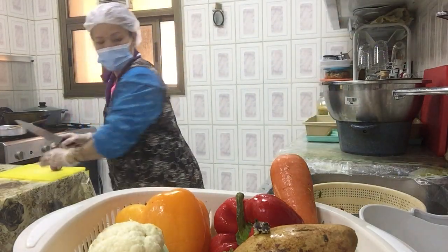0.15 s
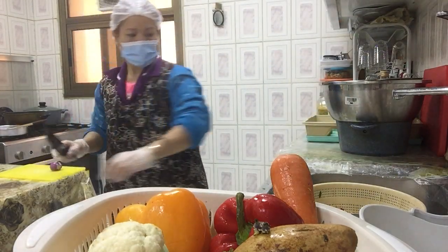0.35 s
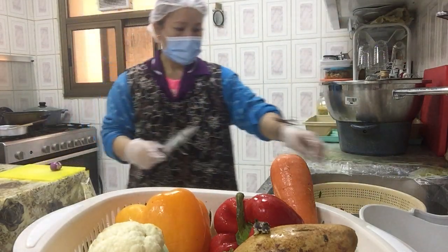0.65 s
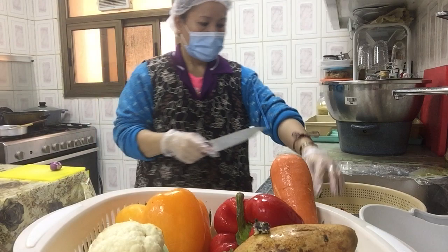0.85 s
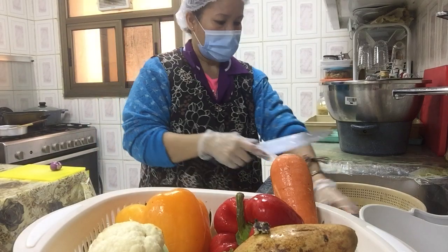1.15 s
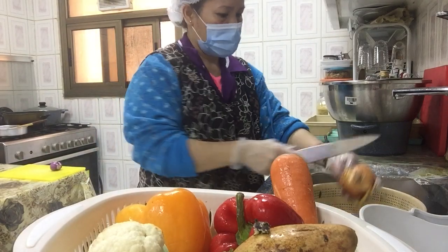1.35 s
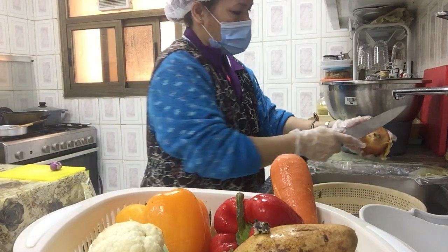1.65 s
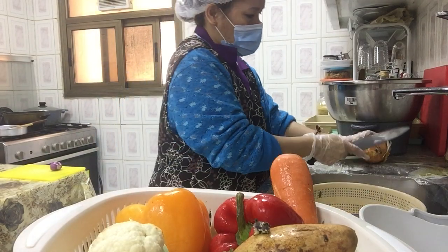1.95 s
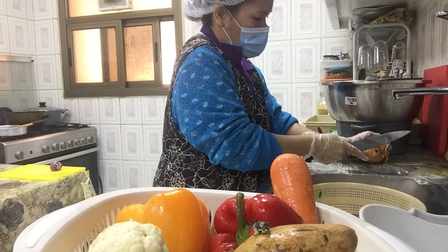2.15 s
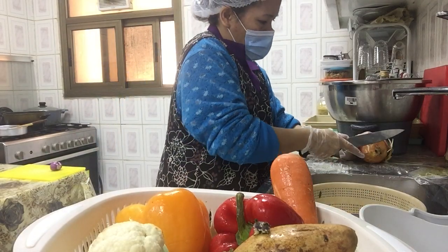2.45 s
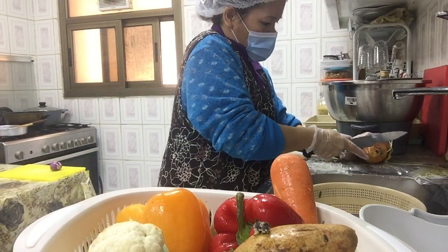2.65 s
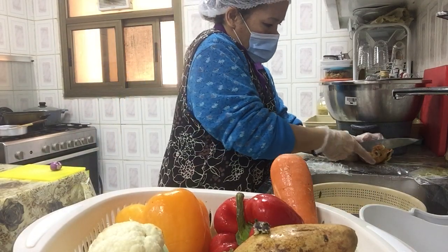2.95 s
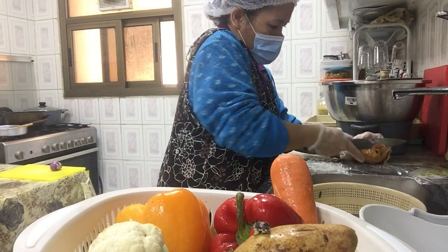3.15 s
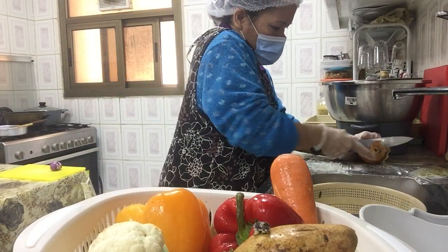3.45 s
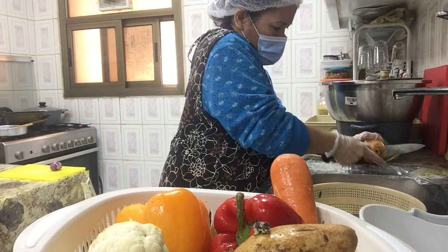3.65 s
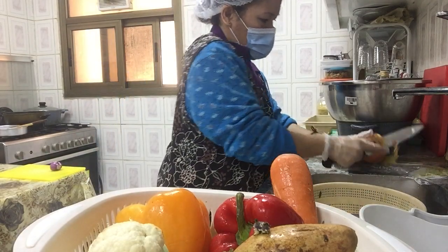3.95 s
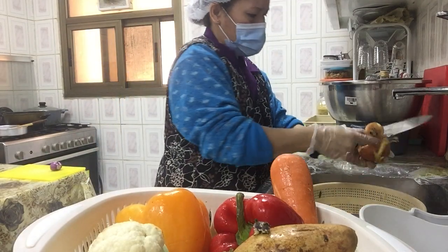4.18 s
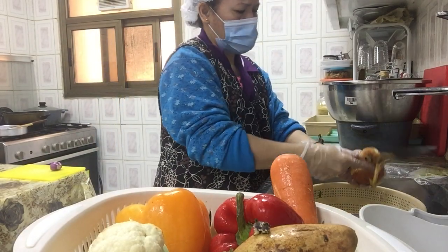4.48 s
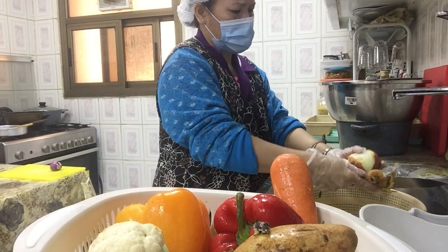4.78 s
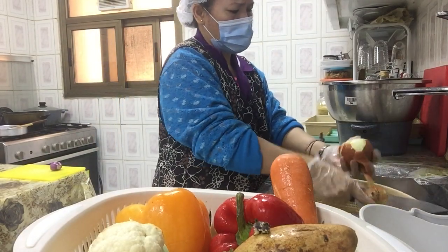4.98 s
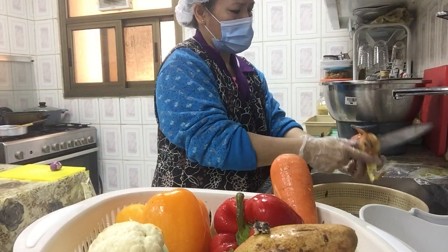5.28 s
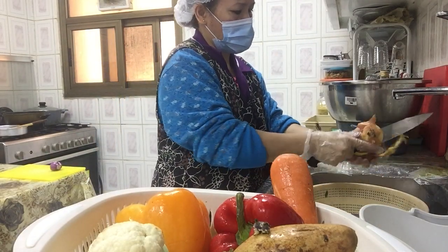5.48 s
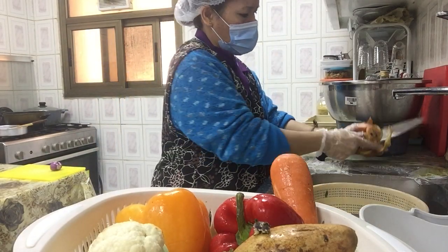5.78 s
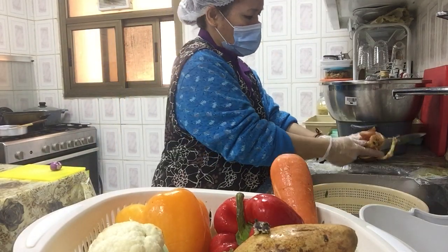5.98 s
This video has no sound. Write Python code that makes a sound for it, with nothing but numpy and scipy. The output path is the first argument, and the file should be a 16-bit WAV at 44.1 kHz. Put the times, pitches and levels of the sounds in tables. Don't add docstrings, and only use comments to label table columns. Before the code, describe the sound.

Over a steady low hum, crisp onion peel snaps and crackles in gloved hands, then hollow thuds knock the steel basin near the end.

```python
import sys
import numpy as np
from scipy import signal
from scipy.fft import rfft, irfft, next_fast_len
from scipy.io import wavfile

SR = 44100
rng = np.random.default_rng(int(sys.argv[2]) if len(sys.argv) > 2 else 0)


def transcribe(u):
    v = np.clip(np.atleast_2d(u).T, -1, 1)
    q = np.round(v * 32767).astype(np.int16)
    wavfile.write(sys.argv[1], SR, q)


def field_ratio(decibels):
    return 10 ** (np.asarray(decibels, dtype=float) / 20)


N = 269892

# [f/Hz, level/dB rms, waver/dB]
COMPRESSOR_LINES = [(100.07, -45.3, .5), (171.1, -48.2, .2), (230.5, -67, 3)]
# [f/Hz, level/dB per Hz]
VENT_SPECTRUM = [(25, 2.5), (45, 2), (85, -1), (118, -1), (150, 0.5), (190, -3.5), (213, -12.5), (245, -9),
                 (340, -16.5), (360, -24.5), (400, -23.5), (640, -16.5), (960, -29), (1200, -25.5),
                 (2300, -30.5), (4000, -43.5), (9000, -46), (15500, -47)]
VENT_DB = -46
# [f/Hz, T60/s, level/dB rms]
DUCT_MODES = [(78, .5, -55.5), (156.8, 0.67, -55), (196, .5, -62.5), (320, 0.11, -72.5), (644, 0.46, -69),
              (751, 0.19, -72.5), (846, 0.17, -73), (1147, 0.029, -76.5), (1270, 0.056, -89),
              (2160, 0.052, -109), (3030, 0.16, -91)]
KITCHEN_T60_S, WALL_CUT_HZ = 0.21, 1300
BASIN_T60_S, BASIN_DB = 0.04, -5

# [t/s, peak level/dB, main f/Hz, T60/s]
SINK_THUMPS = [(.5, -45, 70, 0.13), (1.119, -44, 78, 0.17), (1.331, -55, 84, 0.13),
               (3.171, -37, 74.8, 0.27), (3.26, -42, 88, 0.18), (4.191, -42, 65, .2), (4.93, -39, 70, 0.11),
               (3.05, -47, 69, .2), (1.06, -53, 233, .2), (2.061, -27, 87, 0.044), (2.777, -53, 114, 0.062),
               (2.883, -30.5, 131.5, 0.085), (3.424, -36.5, 199, 0.05), (3.48, -38, 110, .06),
               (3.16, -37, 110, .05), (2.903, -35, 140, 0.043), (2.3, -44, 100, .1),
               (3.731, -29, 102, 0.11), (3.812, -33.5, 107, 0.066), (5.0448, -15.5, 125, 0.04),
               (5.063, -24, 140, 0.035), (5.08, -33, 100, .15), (5.143, -27.5, 105, 0.07),
               (5.175, -17.5, 145, 0.033), (5.197, -30.5, 121.5, 0.21), (5.218, -23, 122, 0.087),
               (5.239, -25, 85.6, 0.08), (5.259, -30, 94, 0.066), (5.9706, -13, 127, 0.055),
               (5.992, -36, 92.5, 0.057), (6.016, -26.5, 97, 0.042)]
# [f/Hz, level/dB, ring length ratio]
BASIN_MODES = [(81.8, -6, 1.73), (195, -6, 1.34), (240, -7, 0.49), (324.4, -9, 1.7)]
# [t/s, peak level/dB, f/Hz, T60/s]
PANEL_RINGS = [(3.112, -48.5, 670, 0.18), (3.74, -49.5, 630, 0.15), (5.043, -35, 1133, 0.045),
               (5.06, -33, 740, 0.08), (5.046, -38, 505, 0.05), (0.56, -56, 1600, 0.17),
               (5.064, -42, 240, 0.1), (5.045, -39, 1300, .05), (5.172, -42, 1350, .05),
               (5.046, -28, 165, .12), (5.19, -32, 160, .1), (2.77, -52, 330, .1), (5.975, -40, 300, .05),
               (5.18, -35.5, 305, 0.082), (4.308, -49, 2000, 0.05), (3.345, -52, 640, .07),
               (3.372, -52, 660, 0.063), (3.425, -51, 670, 0.088), (5.964, -44.5, 620, .07),
               (5.968, -46, 393, 0.053), (5.992, -47, 700, .06), (5.044, -40, 1900, .04),
               (4.69, -51, 560, .12), (5.074, -40.5, 830, 0.093), (5.097, -39, 710, 0.074),
               (5.172, -44, 1600, 0.071), (5.174, -44, 2100, 0.044), (5.186, -42, 730, 0.22),
               (5.203, -44, 1000, 0.12), (5.2, -43, 1900, 0.043), (5.225, -49, 980, 0.1),
               (5.25, -47.5, 850, 0.11), (1.27, -53, 310, 0.28)]
# [t/s, peak level/dB, top re body/dB, rattle T60/s, wall ring level/dB]
CONTACT_KNOCKS = [(2.0547, -34, -5, 0.085, -5.5), (2.768, -44, 6, 0.12, -22),
                  (2.869, -46, -0.5, 0.97, -18.5), (3.13, -52, 1.5, 0.73, -4), (3.291, -43, -2, 0.14, -17),
                  (3.418, -47, -6, 0.13, -10), (3.74, -40, -16, 0.37, -12), (3.819, -40.5, -13, 0.15, -12),
                  (4.684, -39.5, 16.5, 0.17, -23), (4.75, -43, -15, 0.17, -18),
                  (5.044, -20.5, -12.5, 0.35, -6), (5.061, -18.5, -35, 0.047, -22),
                  (5.095, -30.5, -11, 0.24, -9), (5.169, -29.5, -4.5, 0.14, -12),
                  (5.177, -23.5, -18, 0.087, -26), (5.201, -33, -13, 0.19, -16),
                  (5.225, -33, -11, 0.28, -10.5), (5.254, -42, -9, 0.3, -9), (5.963, -30, -10, 0.19, -8),
                  (5.974, -48, -16, 0.088, -3.5), (5.992, -37.5, 9.5, 0.062, -14)]
# [f/Hz, level/dB per Hz]
RATTLE_SPECTRUM = [(300, -23), (480, 0), (700, 6.5), (900, -6), (1150, -6), (1500, -9), (4000, -43)]
# [f/Hz, level/dB, T60/s]
WALL_MODES = [(511, -9, 0.073), (704, -37, 0.035), (641, -8, 0.063), (1080, -12.5, 0.087),
              (1076, -17, 0.053), (1335, -7.5, 0.051), (1730, -15.5, 0.081), (1923, -7, 0.042),
              (2715, -16.5, 0.041)]
HOLLOW_DB, HOLLOW_TRADE = -11.5, 0.6

# [t/s, crisp level/dB, hold/s, papery re crisp/dB, fleshy scrape re crisp/dB]
SKIN_RIPS = [(.51, -74.5, .06, 6, 13), (1.098, -45.5, 0.24, -8, -21), (1.322, -57, 0.018, -6.5, -9),
             (1.584, -64.5, .01, 1, -11), (2.046, -48, 0.023, -4.5, -5.5), (2.864, -37, .12, -14.5, -17.5),
             (2.99, -67, 0.018, -9, -8), (3.08, -63, .005, -18, -14), (3.44, -62, 0.025, 3, 2),
             (3.688, -45, 0.045, -4, -4), (3.8, -45, 0.0073, -12, -17), (4.314, -46, 0.02, -4.5, -13),
             (4.735, -31, 0.011, -9.5, -19), (5.55, -60.5, 0.086, 2, -18), (5.8, -71, .07, -6, -3),
             (6.002, -50.5, 0.071, -3, -17), (6.108, -61, .01, 1, 3)]
SKIN_SPLITS = [(1.914, -57, .11, -10, -18), (2.7415, -37, .065, -15, -28), (4.2422, -44.5, .065, -3.5, -25),
               (4.684, -28.5, .055, -11.5, -24.5), (4.984, -38.5, .34, -8.5, -10),
               (5.478, -43, .04, -9.5, -32), (1.077, -58, .02, -8, -20), (4.236, -53, .006, -4, -20),
               (3.677, -50, .01, -1, -7), (3.7282, -36, .012, -5.5, -15), (2.8455, -44, .012, -16, -22),
               (2.763, -39, .02, -14, -25), (3.4135, -48, .012, -2, -8), (1.092, -53, .06, 2, -22)]
GLOVE_RUBS = [(0.001, -62, 0.028, -10, 0), (.324, -79, .005, -6, 14), (.57, -74, 0.05, 15, 17),
              (.806, -75, .005, 3, 7), (1.678, -60, .005, -6, -18), (1.776, -57.5, 0.0053, -7, -22),
              (2.09, -56, 0.047, -8, -24), (2.6, -73.5, .02, -3, 12), (2.72, -56.5, .01, -8, -11),
              (3.108, -53, 0.0055, -13.5, -12), (3.18, -65, 0.014, -6, -4), (3.318, -47, 0.1, -6.5, -6.5),
              (4.535, -62, .03, -5.5, -20), (4.68, -38, .003, -8, -20), (3.285, -55, .01, -3, -8),
              (2.03, -58, .005, -6, -16), (4.978, -50, .003, -5, -14), (1.935, -58, .02, -3, -20),
              (3.7, -50, 0.016, -5, -12), (3.77, -45, 0.018, -8, -15), (3.722, -42, 0.0046, -1, -7),
              (1.135, -59, 0.029, 1.5, -12), (3.552, -54.5, 0.007, -7, -15), (3.87, -63, 0.13, -3, -1.5),
              (4.116, -48.5, 0.021, -5, -29), (4.2, -59.5, .03, 3, -17), (4.6, -54.5, .06, -3, -15),
              (4.84, -51.5, 0.07, -4, -18), (5.2, -50.5, 0.0032, 0.5, 10), (5.308, -50, 0.0045, -6, -15),
              (5.39, -51.5, 0.09, -1.5, -16), (5.62, -64.5, 0.1, -8, -18), (5.758, -61, 0.018, -5.5, -16),
              (5.945, -54.5, 0.048, 0, -14)]
# [rise/dB per s, sag while held/dB per s, release/dB per s]
RIP_SLOPES = (1500, 100, 230)
SPLIT_SLOPES = (9000, 100, 230)
RUB_SLOPES = (271, -9, 233)
# [fleshy level/dB, papery level/dB, dry level/dB, crisp level/dB]
RESTING_FLOOR_DB = (-67.5, -73.5, -97, -95)
DRY_SHARE, DRY_DB = 0.71, 1.5
RUB_SHARE = 0.49
# [f/Hz, level/dB]
CUPPED_HANDS = [(950, -14), (1300, 0), (2500, 0), (4400, 5.5), (5900, 2), (8600, 1.5), (10200, 2),
                (12300, 4), (15600, 1)]
# [f/Hz, level/dB, T60/s]
BLADE_MODES = [(5540, -19, .08), (6570, -20, .07), (8310, -20, .08), (11320, -22, .05)]
# [t/s, peak level/dB, centre f/Hz, body re peak/dB]
OUTER_TEARS = [(1.0803, -49, 13700, -11), (1.0983, -51, 12600, -7), (1.3142, -41.5, 10800, -8),
               (2.6943, -43, 7300, -11), (2.7118, -39, 12100, -22), (2.741, -20.5, 11700, -27),
               (2.7465, -30, 12300, -30), (2.7515, -28, 14500, -30), (2.7765, -30, 9000, -22),
               (4.3242, -33, 9500, -20), (4.2655, -35, 7000, -15), (2.765, -27, 12100, -33),
               (2.8454, -30, 13900, -27), (2.861, -27, 10750, -29), (2.965, -35.5, 11400, -9),
               (2.972, -27, 12900, -21), (3.1, -35.5, 13900, -20), (3.29, -45, 9300, -15),
               (3.401, -31, 11900, -9), (3.7277, -16, 12300, -16), (4.2423, -24.5, 9350, -10),
               (4.5423, -41, 7340, -23), (4.5925, -20, 9100, -49), (4.6284, -27, 8207, -27),
               (4.638, -29, 9100, -27), (4.6847, -13.5, 9800, -15), (4.688, -18, 9000, -14),
               (4.692, -20, 9500, -18), (4.712, -25, 9000, -20), (4.738, -24, 11000, -25),
               (5.2994, -43, 13300, -14), (5.477, -27, 7240, -8.5), (5.994, -24, 7100, -16),
               (2.8558, -29, 13900, -30), (3.7495, -28, 11500, -20), (3.7455, -30, 11000, -20),
               (3.7355, -27, 11500, -18), (3.767, -33, 9500, -20), (2.8652, -29, 11000, -28),
               (2.88, -29, 12500, -25), (3.7205, -31, 9000, -15), (3.7895, -28, 11500, -25),
               (3.8035, -23, 11500, -16), (4.6157, -36, 9500, -30)]
# [t/s, peak level/dB, centre f/Hz, body re peak/dB, crisp top re peak/dB]
INNER_NICKS = [(1.714, -42.5, 3400, -19, -12), (1.914, -34, 6800, -22, -23),
               (2.0395, -43, 3700, -16, -17.5), (2.0532, -44, 3360, 1, -12), (3.413, -26, 4100, -18, -12),
               (3.4235, -33, 4500, -15, -6), (3.6755, -37, 3620, -25, -9), (3.688, -31, 4530, -21, -8),
               (3.6965, -31, 5000, -15, -8), (3.7065, -31, 6000, -12, -6), (3.753, -31, 4300, -12, -10),
               (1.913, -35, 13500, -30, -2), (4.0715, -39, 4530, -19, -8), (4.156, -36.5, 3120, -16, -13),
               (4.2125, -36, 6160, -11, -10), (4.254, -23, 4160, -17, -4), (4.29, -39, 4500, -15, -5),
               (4.308, -26, 3950, -8.5, -5), (4.8305, -27, 5800, -10, -6), (4.9843, -18, 5140, -14, -17),
               (4.993, -38, 5170, 6.5, -14), (5.169, -44, 3040, 0, -18), (5.4836, -27, 4020, -32, -15),
               (5.963, -47, 4470, -4, 9)]
TEAR_T60_S, TEAR_TOP_DB, NICK_T60_S = 0.19, -16, 0.21


def rms_one(x):
    return x / np.sqrt(np.mean(x ** 2) + 1e-20)


def colour(x, points):
    hz, db = np.transpose(points)
    grid = np.maximum(np.fft.rfftfreq(len(x), 1 / SR), 1)
    gain = field_ratio(np.interp(np.log(grid), np.log(hz), db))
    return irfft(rfft(x) * gain, len(x))


def band(x, low_hz, high_hz):
    edges = [low_hz, min(high_hz, SR / 2.3)]
    return rms_one(signal.sosfilt(signal.butter(2, edges, "band", fs=SR, output="sos"), x))


def drift(rate):
    r = np.exp(-80 * np.pi * rate / SR)
    chance = rng.standard_normal(N // 40 + 2002)
    slow = signal.lfilter([1], [1, -2 * r, r * r], chance)[2000:]
    return np.interp(np.arange(N) / 40, np.arange(len(slow)), rms_one(slow))


def ring(clicks, hz, t60):
    r = field_ratio(-60 / (max(t60, 1e-4) * SR))
    w = 2 * np.pi * min(hz, SR / 2.2) / SR
    return signal.lfilter([0, np.sin(w)], [1, -2 * r * np.cos(w), r * r], clicks + 1e-18)


def add(out, s, x):
    i = round(s * SR)
    out[i:i + len(x)] += x[:N - i]


def background():
    t = np.arange(N) / SR
    lines = np.zeros(N)
    for hz, db, waver_db in COMPRESSOR_LINES:
        level = np.sqrt(2) * field_ratio(db + waver_db * drift(2.8))
        lines += level * np.sin(2 * np.pi * hz * t + 0.092 * drift(2.9))
    air = rms_one(colour(rng.standard_normal(N), VENT_SPECTRUM))
    gusty = signal.sosfilt(signal.butter(1, 900, fs=SR, output="sos"), air)
    gusts = (field_ratio(1.35 * drift(4.5)) - 1) * gusty
    duct = np.zeros(N)
    for hz, t60, db in DUCT_MODES:
        duct += field_ratio(db) * rms_one(ring(rng.standard_normal(N), hz, t60))
    return lines + duct + field_ratio(VENT_DB) * (air + gusts)


def kitchen(x):
    size = next_fast_len(N + SR)
    w = 2 * np.pi * np.fft.rfftfreq(size)
    dull = 1 / np.sqrt(1 + (w * SR / (2 * np.pi * WALL_CUT_HZ)) ** 2)
    walls = 0
    for k, lag_s in enumerate(rng.uniform(0.006, 0.033, 10)):
        loss = field_ratio(-60 * lag_s / KITCHEN_T60_S) * dull ** (lag_s / 0.074)
        lap = loss * np.exp(-1j * w * lag_s * SR)
        walls = walls + (-1) ** k * lap / (1 - lap)
    return irfft(rfft(x, size) * walls, size)[:N]


def basin(x):
    t = np.arange(round(0.2 * SR)) / SR
    places = field_ratio(5.2 * np.array([drift(5.0) for _ in range(4)]))
    places /= np.sqrt(np.sum(places ** 2, axis=0))
    echoes = rng.standard_normal((4, len(t))) * field_ratio(-60 * t / BASIN_T60_S) * (t > 0.0015)
    out = np.zeros(N)
    for share, echo in zip(places, echoes):
        out += signal.fftconvolve(x * share, echo / np.sqrt(np.sum(echo ** 2)))[:N]
    return field_ratio(BASIN_DB) * out


def thumps():
    out, t = np.zeros(N), np.arange(round(0.4 * SR)) / SR
    push = np.sin(np.pi * np.minimum(t / 0.0044, 1)) ** 2
    for s, db, hz, t60 in SINK_THUMPS:
        swell = ring(ring(push, hz, t60), hz, 0.34 * t60)
        others = sum(field_ratio(g) * ring(push / push.sum(), f, k * t60) for f, g, k in BASIN_MODES)
        add(out, s, -field_ratio(db) * (swell / np.max(np.abs(swell)) + others))
    return signal.sosfilt(signal.butter(2, 42, "high", fs=SR, output="sos"), out)


def panels():
    out = np.zeros(N)
    click = 1. * (np.arange(round(0.4 * SR)) == 0)
    for s, db, hz, t60 in PANEL_RINGS:
        swell = ring(ring(click, hz, t60), hz, 0.13 * t60)
        add(out, s, field_ratio(db) * swell / np.max(np.abs(swell)))
    return out


def knocks():
    out, t = np.zeros(N), np.arange(round(0.4 * SR)) / SR
    chance = rng.standard_normal((len(CONTACT_KNOCKS), 3, len(t)))
    uneven_db = rng.normal(0, 0.28, (len(CONTACT_KNOCKS), len(WALL_MODES)))
    click = 1. * (t == 0)
    onset = np.minimum(t / 0.00047, 1)
    for knock, (dull, bright, deep), luck in zip(CONTACT_KNOCKS, chance, uneven_db):
        s, db, top_db, t60, ring_db = knock
        fall_db = -60 * t / max(t60, 0.01)
        rattle = field_ratio(fall_db - 15.5) * rms_one(colour(dull, RATTLE_SPECTRUM))
        hollow = field_ratio(fall_db + HOLLOW_DB - HOLLOW_TRADE * ring_db - 3.5) * band(deep, 113, 290)
        scuff = field_ratio(2.45 * fall_db + top_db - 9.5) * band(bright, 2000, 5550)
        modes = np.zeros(len(t))
        for (hz, g, ring_s), d in zip(WALL_MODES, luck):
            modes += field_ratio(g + d + ring_db) * ring(click, hz, ring_s)
        add(out, s, field_ratio(db) * (onset * (rattle + hollow + scuff) + modes))
    return out


def all_snaps():
    tears = [(s, db, hz, body, TEAR_T60_S, TEAR_TOP_DB) for s, db, hz, body in OUTER_TEARS]
    nicks = [(s, db, hz, body, NICK_T60_S, top) for s, db, hz, body, top in INNER_NICKS]
    return tears + nicks


def handling():
    t = np.arange(0, N + 64, 64) / SR
    power = field_ratio(np.array(RESTING_FLOOR_DB))[:, None] ** 2 + 0 * t
    strokes = ((SKIN_RIPS, RIP_SLOPES), (SKIN_SPLITS, SPLIT_SLOPES), (GLOVE_RUBS, RUB_SLOPES))
    for rows, (rise, sag, release) in strokes:
        for s, db, hold, paper_db, flesh_db in rows:
            since, hold = t - s, max(hold, 0)
            shape = rise * np.minimum(since, 0) - sag * np.clip(since, 0, hold)
            shape -= release * np.maximum(since - hold, 0)
            tint = np.array([flesh_db, paper_db, DRY_DB + DRY_SHARE * paper_db, 0])
            power += field_ratio(db + tint[:, None] + shape) ** 2
    return [np.interp(np.arange(N) / SR, t, 10 * np.log10(p)) for p in power]


def dips_before_tears():
    t, db = np.arange(N) / SR, np.zeros(N)
    for s, peak_db, *_ in all_snaps():
        near = slice(round((s - 0.02) * SR), round(s * SR))
        strength = np.clip((peak_db + 46) / 16, 0, 1)
        db[near] = -4 * strength * (1 - (s - t[near]) / 0.02)
    return db


def rustle(patch_db=1.5, cycles=7.0):
    zones = handling()
    sizes = field_ratio(2.6 * np.minimum(rng.exponential(1, N), 4)) * rng.choice([-1, 1], N)
    happens = rng.random(N) < 22000 / SR
    cracks = sizes * happens * field_ratio(0.8 * drift(40.0) + dips_before_tears())
    rubbing = rng.standard_normal((2, N))
    clumps = field_ratio(2.0 * drift(130.0))
    dealt = rng.integers(0, 22, N)
    out = np.zeros(N)
    for k, hz in enumerate(np.geomspace(1300, 15400, 22)):
        place = np.interp(np.log(hz), np.log([2000, 4600, 8000, 12500]), [0, 1, 2, 3])
        low = min(int(place), 2)
        db = zones[low] + (place - low) * (zones[low + 1] - zones[low])
        drive = clumps * (cracks * (dealt == k) + RUB_SHARE * rubbing[k % 2])
        flake = ring(ring(drive, hz, cycles / hz), hz, cycles / hz)
        out += field_ratio(db - 12.0 + patch_db * drift(15.4)) * rms_one(flake)
    return out


def blade(skin, coupling_db=-34):
    hard = field_ratio(coupling_db) * skin
    for s, db, *_ in all_snaps():
        hard[round(s * SR)] += field_ratio(db - 6 + min(db + 10.5, 0))
    return sum(field_ratio(db) * ring(hard, hz, t60) for hz, db, t60 in BLADE_MODES)


def snaps():
    out, t = np.zeros(N), np.arange(round(0.15 * SR)) / SR
    chance = rng.standard_normal((len(all_snaps()), len(t)))
    chance[:, 0] = 3.3
    for (s, db, hz, body_db, t60, top_db), split in zip(all_snaps(), chance):
        dying = np.exp(-t / 0.003) + field_ratio(-11 - 60 * t / max(t60, 0.01))
        burst = split * dying
        tear = field_ratio(-3.5) * band(burst, 0.7 * hz, 1.51 * hz)
        tear += field_ratio(top_db - 19) * band(burst, 11000, 17000)
        tear += field_ratio(body_db + 1) * band(burst, 1450, 3200)
        tear += field_ratio(-8) * rms_one(ring(burst, hz, 12 / hz))
        add(out, s, field_ratio(db - 12.0) * np.sqrt(np.mean(dying ** 2)) * tear)
    return out


def scene():
    skin = rustle()
    sink = thumps() + knocks() + panels()
    rub = colour(skin, CUPPED_HANDS) + blade(skin)
    tears = snaps()
    room = kitchen(field_ratio(-16) * (rub + tears) + field_ratio(-15.5) * sink)
    close = basin(rub + field_ratio(-6) * tears)
    return (field_ratio(-2.0) * (rub + close) + tears + sink + room + background())[None]


def low_pass(x):
    return signal.sosfilt(signal.butter(12, 16690, fs=SR, output="sos"), x)


def record(dry):
    thin = signal.sosfilt(signal.butter(4, 62, "high", fs=SR, output="sos"), dry)
    cut = signal.sosfilt(signal.ellip(10, 1, 45, 15800, fs=SR, output="sos"), thin)
    return low_pass(cut)


dry = scene()
out = record(dry)
transcribe(out)
```